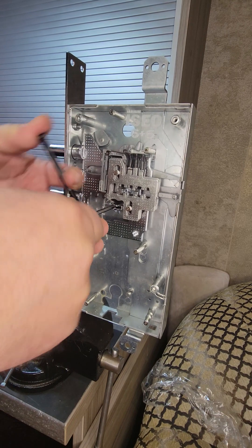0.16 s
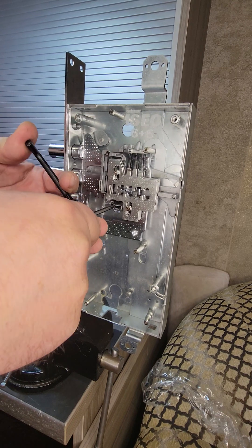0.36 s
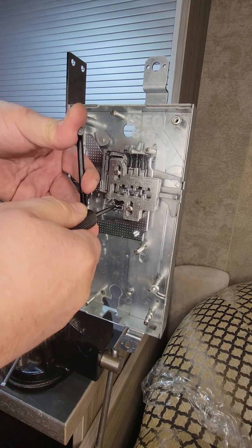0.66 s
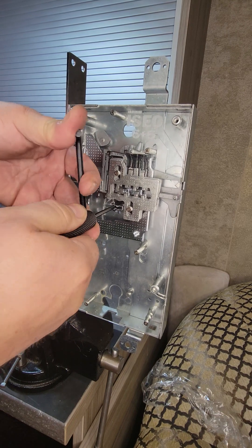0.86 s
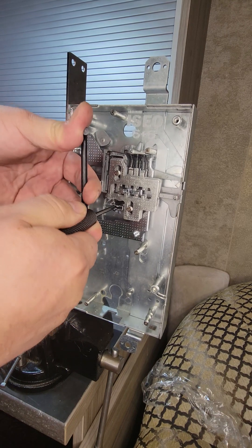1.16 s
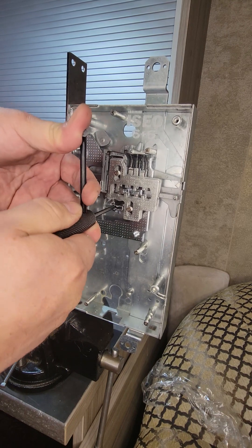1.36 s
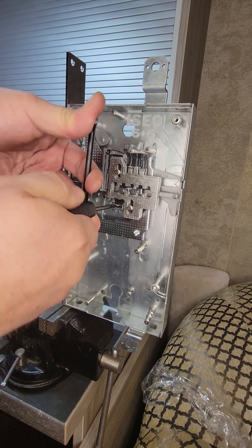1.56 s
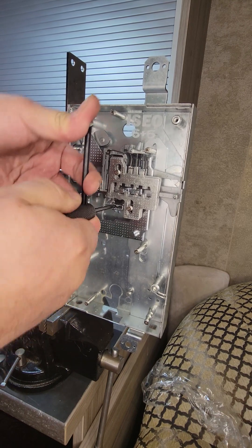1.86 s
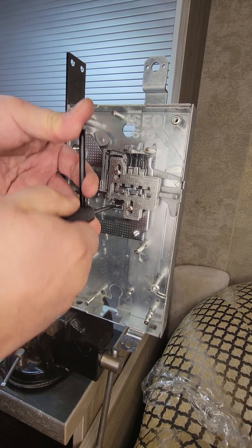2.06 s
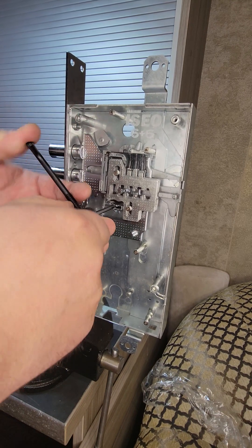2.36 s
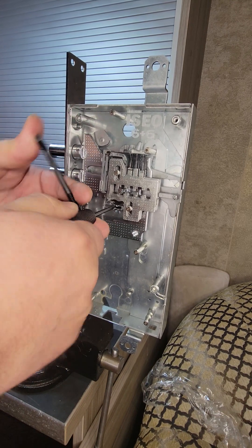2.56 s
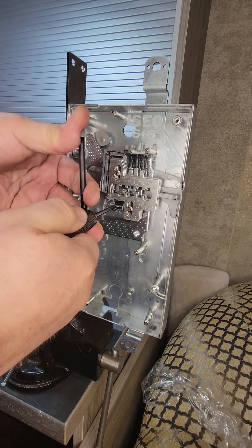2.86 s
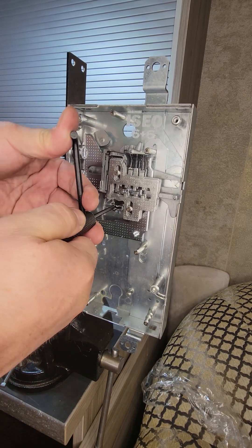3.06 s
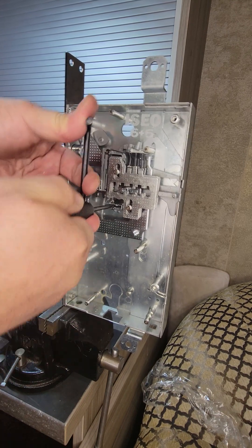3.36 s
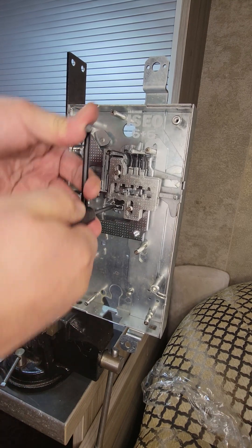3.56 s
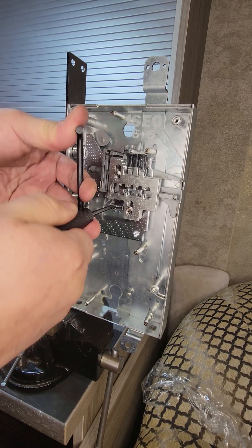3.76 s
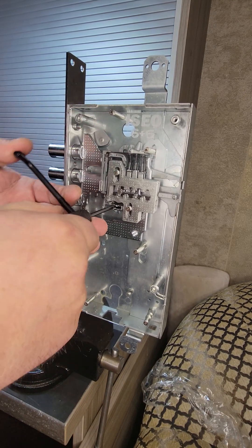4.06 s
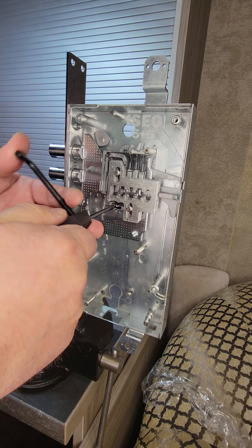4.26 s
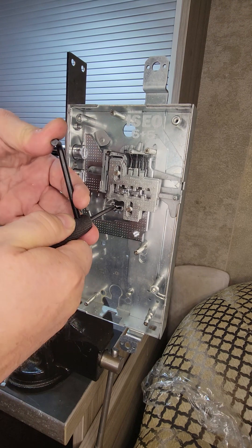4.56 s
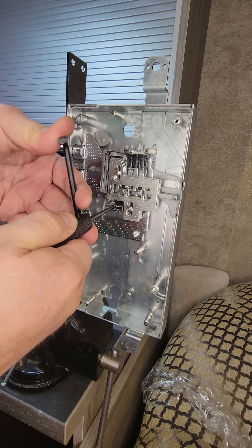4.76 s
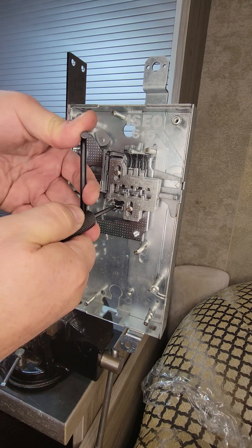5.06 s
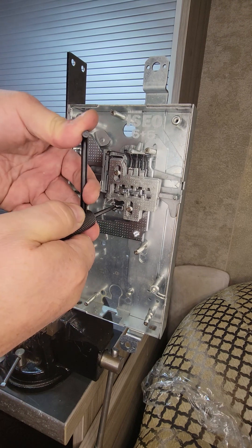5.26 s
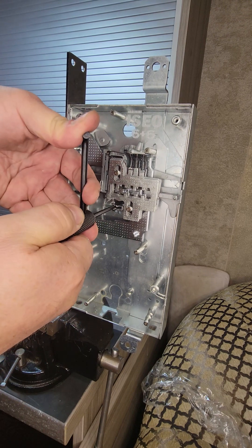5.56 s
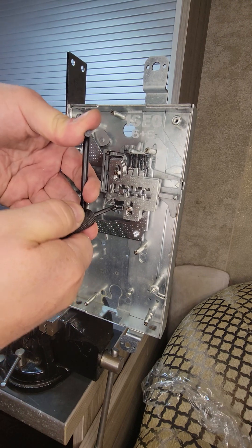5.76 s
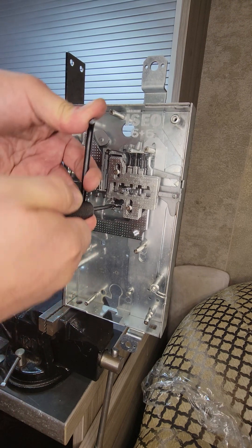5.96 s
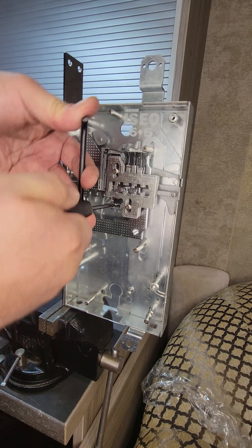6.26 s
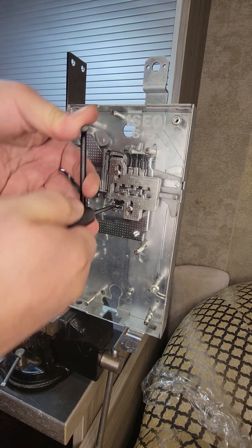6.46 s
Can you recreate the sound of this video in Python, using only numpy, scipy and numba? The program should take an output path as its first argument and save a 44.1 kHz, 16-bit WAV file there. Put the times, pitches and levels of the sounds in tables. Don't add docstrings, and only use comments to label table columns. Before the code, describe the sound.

Thin steel levers tick and snap inside a hollow metal case as a pick rubs and drags across them. Scraping opens the sequence, then fainter clicks lead to two hard snaps, busy rattling, another strong snap and a dense cluster near four seconds. Light touches follow before final snaps. Low thumps pass through the vice; a faint motor hums early on. Close phone pickup, short indoor echoes.

```python
import sys
import numpy as np
from scipy import signal
from scipy.fft import rfft, irfft
from scipy.io import wavfile
from scipy.ndimage import uniform_filter1d
from numba import njit

SR = 44100
rng = np.random.default_rng(int(sys.argv[2]) if len(sys.argv) > 2 else 0)


def voltage_ratio(decibels):
    exponent = np.asarray(decibels, float) / 20
    return 10 ** exponent


def to_wav(sig):
    pcm = np.clip(np.atleast_2d(sig), -1, 1) * 32767
    pcm = np.round(pcm).astype(np.int16)
    wavfile.write(sys.argv[1], SR, pcm.T)


N = 292383
T = np.arange(N) / SR


def band(x, lo_hz, hi_hz, order=2):
    return signal.sosfilt(signal.butter(order, [lo_hz, hi_hz], "band", fs=SR, output="sos"), x)


def unit(x):
    return x / np.sqrt(np.mean(x ** 2))


def peak(x, db):
    return x * voltage_ratio(db) / np.abs(x).max()


def curve(rows):
    s, *columns = np.transpose(rows)
    return [np.interp(T, s, c) for c in columns]


def add(out, x, s):
    i = max(int(s * SR), 0)
    out[i:i + len(x)] += x[:N - i]


def late(x, count):
    return np.concatenate([np.zeros(count), x[:-count]])


def tagged(*groups):
    return [(*row, shared) for rows, shared in groups for row in rows]


def swell(t, tau):
    return (t / tau * np.exp(1 - t / tau)) ** 2


def decay(t, t60):
    return np.exp(-np.log(1000) * t / t60)


def ring(modes, t, scatter_db, detune=0.012):
    hz, db, t60 = np.transpose(modes)[:, :, None]
    gain_chance, pitch_chance, phase_chance = rng.standard_normal((3, len(modes), 1))
    gain = voltage_ratio(db + scatter_db * gain_chance)
    phase = 2 * np.pi * hz * (1 + detune * pitch_chance) * t + 7 * phase_chance
    return (gain * decay(t, t60) * np.sin(phase)).sum(axis=0)


@njit
def resonate(x, hz, width):
    y, b, l = np.empty(len(x)), 0., 0.
    for i in range(len(x)):
        g, k = np.tan(np.pi * hz[i] / SR), width / hz[i]
        v = (b + g * (x[i] - l)) / (1 + g * (g + k))
        b, l, y[i] = 2 * v - b, l + 2 * g * v, k * v
    return y


def slip_wander(count):
    return uniform_filter1d(rng.standard_normal(count), 200) * np.sqrt(200)


def voice(slips, modes):
    return unit(sum(voltage_ratio(db) * unit(resonate(slips, np.full(N, float(hz)), width)) for hz, width, db in modes))


# t/s, case scrape level/dB, steel grit level/dB
RUB = [(0.0, -39.5, -64), (0.42, -63, -74), (1.07, -73, -82), (1.66, -66, -67), (1.77, -45, -78.5),
       (2.23, -54, -57.5), (2.53, -70, -66), (4.12, -55.5, -71), (4.21, -61.5, -65), (5.45, -90, -74),
       (6.48, -92, -70), (6.63, -63, -50)]
# t/s, length/s, level/dB
DRAGS = [
    (1.126, 0.045, -45),
    (1.283, 0.025, -53),
    (2.275, 0.058, -51.5),
    (3.204, 0.095, -47),
    (0.103, 0.15, -49.5),
    (2.746, 0.048, -48),
    (3.542, .012, -43.5),
    (4.526, 0.022, -45.5),
]
# t/s, length/s, start f/Hz, end f/Hz, level/dB, step to each next overtone/dB
SQUEAKS = [
    (2.303, .028, 1640, 1710, -31, -20),
    (2.688, .05, 2230, 1900, -55, -14),
    (3.227, .046, 632, 626, -54, -2),
    (1.305, .29, 965, 961, -67, -40),
    (1.275, .085, 335, 400, -70, -40),
    (5.155, .115, 406, 401, -72, -40),
]


def scrape():
    case_db, steel_db = curve(RUB)
    slips = rng.standard_normal(N) * voltage_ratio(2.9 * slip_wander(N))
    case_modes = [(564, 510.0, 5.5), (980, 310.0, 16.0), (1594, 580.0, -7), (2600, 400.0, -11)]
    steel_modes = [(4350, 780.0, 2.0), (7200, 520.0, -9.0), (11500, 17000.0, 2.0)]
    out = voltage_ratio(case_db - 4.5) * voice(slips, case_modes)
    pressure = voltage_ratio(steel_db - 14.0)
    for s, length, db in DRAGS:
        pressure += voltage_ratio(db) * np.clip(np.minimum(T - s, s + length - T) / 0.0026, 0, 1)
    out += pressure * voice(slips, steel_modes)
    for s, length, from_hz, to_hz, db, step_db in SQUEAKS:
        t = T[:int(length * SR)]
        wobble = 1 + 0.012 * slip_wander(len(t))
        hz = (from_hz + (to_hz - from_hz) * t / length) * wobble
        phase = 2 * np.pi * np.cumsum(hz) / SR
        tone = sum(voltage_ratio(k * step_db) * np.sin((k + 1) * phase) for k in range(6))
        add(out, voltage_ratio(db) * np.sqrt(np.sin(np.pi * t / length)) * tone, s)
    return out


# f/Hz, level per Hz/dB
AIR = [(20, -9.5), (90, -2.5), (489, -2.5), (714, -12.5), (911, -5.5), (1740, -19), (7920, -43),
       (15000, -35)]
# t/s, level/dB
HUM = [
    (0, -94),
    (.8, -65.5),
    (1.3, -65),
    (1.6, -64),
    (2.6, -74),
    (3.1, -80),
    (6.63, -98),
]


def air():
    f = np.maximum(np.fft.rfftfreq(N, 1 / SR), 1)
    hz, db = np.transpose(AIR)
    mid, side = rfft(rng.standard_normal((2, N))) * voltage_ratio(np.interp(np.log(f), np.log(hz), db))
    side = side * np.minimum(f / 900, 1)
    tone = unit(irfft(np.array([mid + side, mid - side]), N)) * voltage_ratio(-66.5)
    motor_hz = 72.6
    motor = np.sin(2 * np.pi * 2 * motor_hz * T) + voltage_ratio(-3) * np.sin(2 * np.pi * motor_hz * T)
    return tone + np.sqrt(2) * voltage_ratio(curve(HUM)[0]) * motor


# f/Hz, width/Hz, level/dB, t60/s
LEVERS = [(2447, 390, -21, 0.047), (3240, 800, -5.5, 0.31), (3870, 900, 0.5, 0.41), (5350, 330, 1, 0.42),
          (6090, 920, -13, 0.11), (7400, 280, 1, 0.36), (9400, 550, -15, 0.23), (10180, 320, 3.5, 0.12),
          (12760, 200, 0.5, 0.31), (12840, 500, -7, 0.091), (14160, 750, 4.5, 0.2), (15000, 900, 3.5, .15)]
# t/s, peak level below 8 kHz/dB, relative level above 8 kHz/dB
SNAPS = [(.0109, -24.5, -35), (.0593, -28, -20), (.6014, -46.5, 5.5), (.617, -43, 1), (1.1206, -36.5, -4),
         (1.172, -33.5, -7.5), (1.282, -40, -9), (1.5871, -35, -2), (1.6475, -40, -31),
         (1.7886, -10.5, -1.5), (2.0531, -10.5, -2), (2.1703, -43, 0.5), (2.7482, -42, -2.5),
         (2.9746, -41, -3), (3.3095, -29.5, -3), (3.5545, -9, 0.5), (3.8649, -15.5, -1.5),
         (4.1588, -15.5, -8), (4.403, -27.5, -19.5), (4.7167, -41.5, -16.5), (4.7376, -39.5, -11.5),
         (5.065, -36.5, -8), (5.0965, -54, -6), (5.1205, -37.5, -8), (5.3718, -45, -15.5),
         (5.8363, -37, -14), (5.9503, -19, 0.5), (6.4436, -12, 0.5)]
# t/s, peak level below 8 kHz/dB, relative level above 8 kHz/dB
JINGLES = [(.109, -20, -15), (.1605, -26, -22), (.1719, -17.5, -5.5), (.4454, -51.5, -28),
           (.5583, -46, -11), (.6464, -31, -8), (.7281, -40.5, -13), (2.2727, -47, -2),
           (2.3595, -30, -10.5), (2.603, -53, -13.5), (2.7287, -38, -13), (2.7724, -24.5, -13),
           (2.862, -42.5, -1), (3.019, -39, -2), (3.209, -32, -20.5), (3.463, -52, -29),
           (3.5234, -42.5, -7.5), (3.8824, -21, 0.5), (4.0048, -30, -20), (4.046, -24, -8),
           (4.14, -18, -23), (4.5182, -26.5, -26), (4.8979, -24.5, -10), (4.988, -40, -32),
           (5.884, -46, -5), (6.312, -57.5, -3.5), (6.4163, -33, -15)]
# t/s, f/Hz, level/dB, t60/s
RINGS = [(1.174, 4030, -53, 0.44), (3.312, 4020, -49.5, 0.38), (4.737, 4040, -58, 0.3),
         (5.064, 4000, -53, 0.19), (5.121, 4020, -50, 0.25), (5.371, 4000, -57, 0.16),
         (5.949, 3566, -40, 0.4), (5.949, 6150, -33, 0.094), (5.952, 7400, -37.5, 0.13),
         (1.79, 3380, -27.5, 0.1), (0.645, 10260, -51, 0.17)]


def ticks():
    out, t = np.zeros(N), T[:SR // 4]
    hz, width, gain_db, t60 = np.transpose(LEVERS)
    crowd = np.array([unit(band(rng.standard_normal(SR), f - w / 2, f + w / 2, order=1)) for f, w in zip(hz, width)])
    fade = decay(t, t60[:, None]) * (1 - np.exp(-t / 0.0069))
    for s, db, top_db, ring_db in tagged((SNAPS, -23), (JINGLES, -17)):
        start = rng.integers(SR // 2)
        gains = voltage_ratio(gain_db + 3.5 * rng.standard_normal(len(hz)))
        struck = gains[:, None] * crowd[:, start:start + len(t)]
        chatter = unit(struck.sum(axis=0)) + voltage_ratio(3.0) * rng.standard_normal(len(t))
        ringing = (struck * fade).sum(axis=0)
        snap = peak(chatter * swell(t, 0.002), 0) + peak(ringing, min(ring_db, 0))
        plate = voltage_ratio(12.5) * band(snap, 2100, 4010)
        body = peak(band(snap, 1500, 8200, order=3) + plate, db + 1.5)
        top = peak(band(snap, 8940, 14000, order=3), db + top_db + 2.0)
        add(out, body + top, s - 0.0012)
    for s, f, db, t60 in RINGS:
        glide_hz = f * (1 + 0.03 * np.exp(-t / 0.05))
        cluster = unit(resonate(rng.standard_normal(len(t)), glide_hz, f / 25))
        add(out, voltage_ratio(db) * cluster * (decay(t, t60) + 0.85 * swell(t, 0.0025)), s)
    return out


# f/Hz, level/dB, t60/s
CAVITY = [(585, 5, 0.05), (732, -1.5, .025), (845.6, -1.5, 0.028), (985, -23.5, 0.065), (1060, -8.5, 0.037)]
# f/Hz, level/dB, t60/s
WALLS = [(1350, -5, .014), (1620, 0, .02), (1900, -3, .014), (2200, -1, .014), (2500, -3, .012),
         (2750, -2, .012), (3150, -3, .012)]
# t/s, peak level/dB, cavity f/Hz
HOLLOW = [(.1, -26, 990), (.111, -22.5, 1032), (.193, -23.5, 980), (.533, -42, 1030), (1.124, -44.5, 1000),
          (1.174, -43, 1000), (1.283, -49, 1076), (1.794, -26.5, 945), (1.914, -36.5, 972),
          (2.053, -27.5, 1000), (2.24, -32.5, 930), (2.253, -30, 1070), (2.745, -20, 1010),
          (2.978, -49, 1000), (3.222, -39, 963), (3.555, -15, 1073), (3.683, -31, 1000),
          (4.051, -32.5, 1067), (4.084, -32.5, 930), (4.122, -35.5, 965), (4.192, -30.5, 936),
          (4.517, -29, 1097), (4.894, -21.5, 1000), (5.041, -46, 980), (5.125, -46, 980),
          (5.886, -50.5, 980), (5.954, -29.5, 962), (6.095, -42, 1006), (6.447, -23, 975),
          (6.585, -33.5, 980)]
# t/s, peak level/dB, cavity f/Hz
RAPS = [(.133, -22, 980), (.616, -24.5, 1004), (.648, -19.5, 935), (1.625, -30, 920), (1.966, -36.5, 1060),
        (2.029, -47, 920), (2.359, -21.5, 1015), (2.765, -20.5, 949), (2.868, -37, 1030),
        (3.04, -51.5, 980), (3.312, -39, 985), (3.396, -31.5, 900), (3.499, -36, 980), (3.961, -38.5, 1080),
        (4.157, -29.5, 1006), (4.405, -26, 980), (4.527, -20, 1012), (4.918, -26.5, 984),
        (4.955, -32.5, 960), (4.989, -37, 1010), (5.069, -47.5, 964), (5.374, -47.5, 957),
        (5.84, -40.5, 1016), (6.414, -36, 1000), (6.499, -44, 940)]
# t/s, peak level/dB
CLANKS = [(.011, -28), (.059, -29), (.167, -23), (0.276, -37), (0.495, -43.5), (0.507, -48), (.643, -32),
          (4.388, -50), (1.149, -43.5), (1.297, -47.5), (1.588, -46), (1.716, -34.5), (2.174, -40),
          (2.277, -31), (2.33, -42), (3.208, -44), (3.266, -44.5), (3.465, -35.5), (3.521, -36.5),
          (3.789, -41), (3.866, -22), (3.999, -25.5), (4.141, -24.5), (4.496, -25), (5.102, -46),
          (6.553, -43)]


def knocks():
    out, t = np.zeros(N), T[:SR // 6]
    push_t = T[:SR // 40]
    push = swell(push_t, 0.0021)
    clanks = [(s, db, 962) for s, db in CLANKS]
    for s, db, hz, wall_db in tagged((HOLLOW, -2.5), (RAPS, 1), (clanks, 6.5)):
        rough = push * rng.standard_normal(len(push))
        drive = push * np.sin(2 * np.pi * hz * push_t) + 0.43 * band(rough, 320, 2100)
        cavity = signal.fftconvolve(ring(CAVITY + [(hz, 0, 0.02)], t, 2.2), drive)
        rattle = band(rng.standard_normal(len(cavity)), 930, 2900)
        rattle[:len(push)] *= push
        rattle[len(push):] = 0
        walls = signal.fftconvolve(ring(WALLS, t, 0.67, detune=0.06), band(rough, 900, 3500))
        shell = peak(walls, 3.0) + peak(rattle, 0)
        add(out, peak(cavity, db - 0.3) + peak(shell, db + wall_db), s - 0.0022)
    return out


# f/Hz, level/dB, t60/s
DEEP = [(51.4, -1.5, 0.34), (70.1, -2, 0.48)]


def frame(t):
    return ring(DEEP, t, 3.0, detune=0.014) * (1 - np.exp(-t / 0.036))


# f/Hz, level/dB, t60/s
BENCH = [(135, -18.5, 0.042), (205.6, -18.5, 0.084)]
# t/s, peak level/dB, vice sway f/Hz
JOLTS = [(.101, -28.5, 110), (.16, -30, 119), (.194, -31.5, 101), (.512, -46, 118), (.569, -44, 101),
         (.626, -34.5, 103), (.659, -33.5, 127.4), (1.185, -57.5, 134), (1.798, -36.5, 123),
         (2.283, -33, 105.4), (2.429, -53, 99.5), (2.658, -47, 108), (2.742, -31.5, 111),
         (2.81, -32.5, 102), (3.619, -46, 100), (3.887, -37, 120), (4.011, -29.5, 108), (4.199, -49, 98),
         (4.416, -40.5, 117), (4.533, -28.5, 107), (4.599, -63, 93), (5.023, -47, 90.7), (5.087, -55, 93),
         (5.846, -65, 112), (5.964, -38.5, 115.6), (6.097, -40.5, 106), (6.402, -39.5, 98.4),
         (6.451, -33, 114.4)]
# t/s, peak level/dB, vice sway f/Hz
TUGS = [(.013, -30.5, 109), (.289, -35, 125.6), (.339, -51, 136.5), (1.652, -29.5, 118.3),
        (1.709, -32.5, 105), (1.849, -48, 93), (1.916, -37.5, 125), (1.988, -35.5, 103),
        (2.064, -32, 110.6), (2.18, -35, 111.5), (2.368, -30.5, 108.7), (2.869, -65, 97), (2.982, -65, 111),
        (3.417, -29, 106.5), (3.495, -35.5, 98.5), (3.564, -28, 108), (3.696, -34.5, 106.6),
        (3.789, -34, 103), (4.092, -27.5, 119), (4.154, -26, 104.5), (4.912, -35, 115), (4.969, -48, 120),
        (6.292, -44.5, 118), (6.509, -41, 104), (6.579, -39.5, 117)]
# t/s, peak level/dB
RUMBLES = [(0.1, -41), (.194, -43), (0.513, -47), (.569, -55), (.659, -45), (1.709, -39.5), (1.798, -40),
           (1.918, -43.5), (2.812, -57), (3.495, -59.5), (3.789, -46), (4.535, -52), (4.971, -47), (6.4, -43),
           (6.453, -45)]


def bench():
    out, t = np.zeros(N), T[:SR // 3]
    for s, db, hz, thud_db in tagged((JOLTS, -8), (TUGS, -19)):
        sway = ring(BENCH + [(hz, 0, 0.12)], t, 4.6, detune=0.005) * (1 - np.exp(-t / 0.012)) ** 2
        thud = band(rng.standard_normal(len(t)), 190, 650) * decay(t, 0.25) * (1 - np.exp(-t / 0.00043))
        add(out, peak(sway, db) + peak(frame(t), db - 20.5) + peak(thud, db + thud_db), s - 0.01)
    for s, db in RUMBLES:
        add(out, peak(frame(t), db), s - 0.01)
    return out


# f/Hz, t60/s, level/dB
ROOM = [(245, 0.34, -7), (583, 0.15, -12), (1000, 0.18, -36.5), (1737, 0.29, -9.5), (3580, 0.17, -12.5),
        (8400, 0.35, -8), (13900, 0.2, -4.5)]


def room(x):
    t, tail = T[:SR // 2], 0
    for hz, t60, db in ROOM:
        lo_hz, hi_hz = hz / 1.677, min(hz * 1.385, 20000)
        mid, side = (unit(band(rng.standard_normal(len(t)), lo_hz, hi_hz)) for _ in range(2))
        spread = np.clip((hz / 2200) ** 2 + 0.22, 0, 1)
        pair = mid + spread * side * np.array([[1], [-1]])
        tail = tail + voltage_ratio(db) * pair * decay(t, t60) / np.sqrt(t60 * SR / 7)
    tail = tail * (1 - np.exp(-t / 0.00043))
    return signal.fftconvolve(x[None], tail, axes=1)[:, :N]


BOUNCE_LAGS = 45, 41


def scene():
    lock = ticks() + knocks() + scrape()
    wood = bench()
    near = lock + wood
    direct = np.array([voltage_ratio(-2.43) * near, late(near, 8)])
    bounce = voltage_ratio(-11.5) * np.array([late(lock, lag) for lag in BOUNCE_LAGS])
    return voltage_ratio(2.5) * (direct + bounce) + room(lock + voltage_ratio(-2.5) * wood) + air()


def roll_off(x):
    return signal.sosfilt(signal.butter(12, 16980, fs=SR, output="sos"), x)


def record(dry):
    x = signal.sosfilt(signal.butter(2, 35, "high", fs=SR, output="sos"), dry)
    x = signal.sosfilt(signal.ellip(8, 1, 45, 15950, fs=SR, output="sos"), x)
    return roll_off(x)


dry = scene()
out = record(dry)
to_wav(out)
```